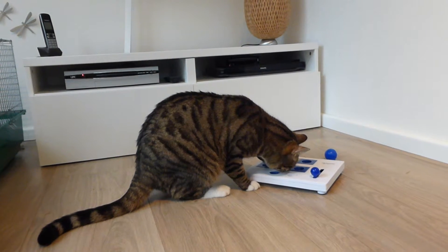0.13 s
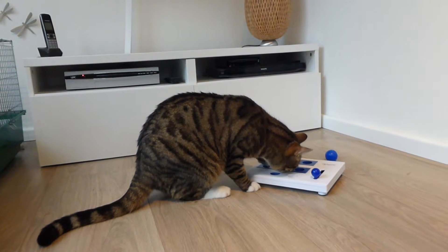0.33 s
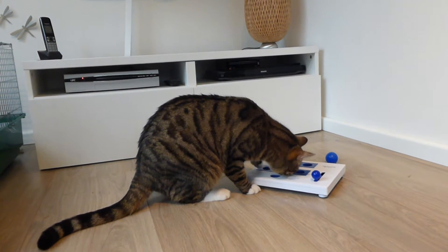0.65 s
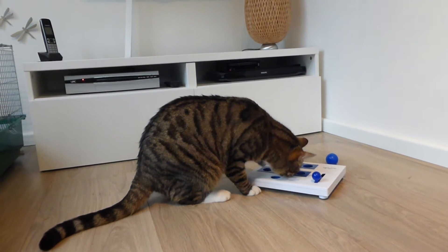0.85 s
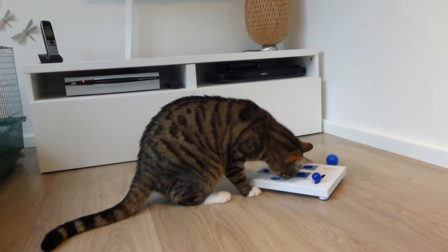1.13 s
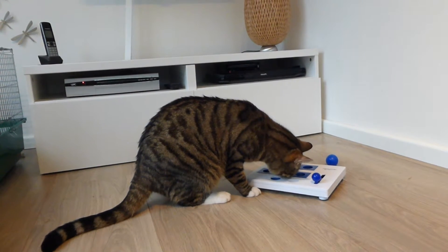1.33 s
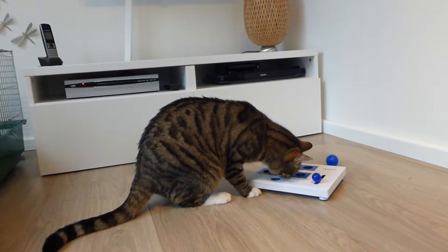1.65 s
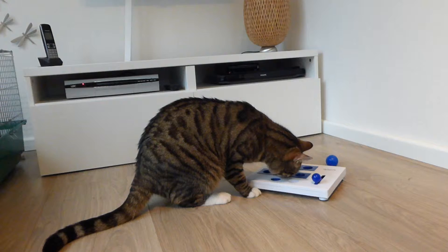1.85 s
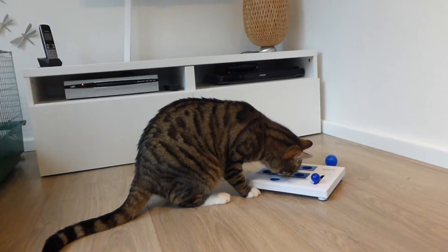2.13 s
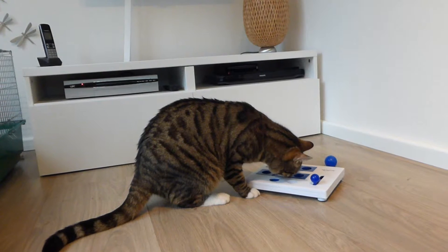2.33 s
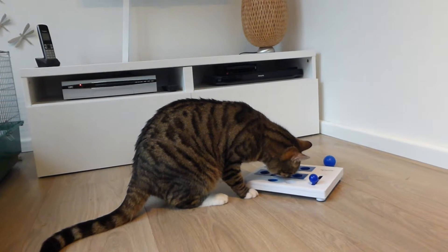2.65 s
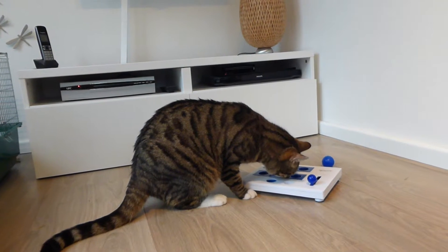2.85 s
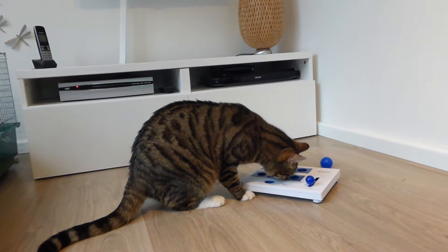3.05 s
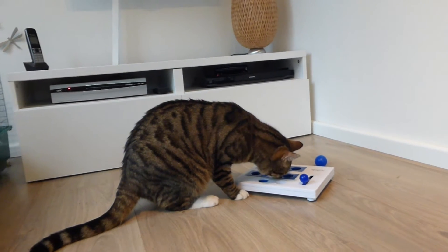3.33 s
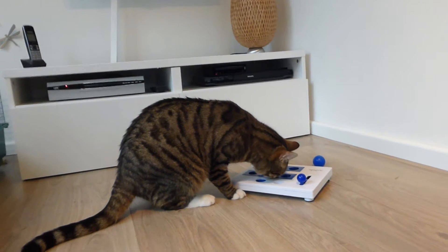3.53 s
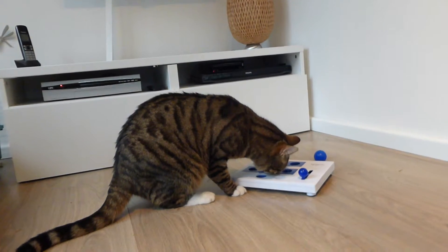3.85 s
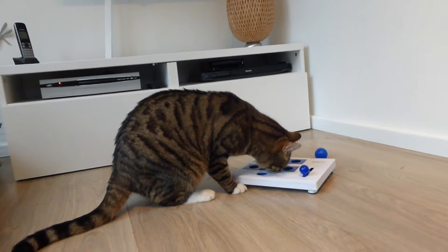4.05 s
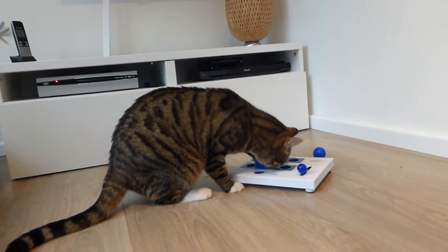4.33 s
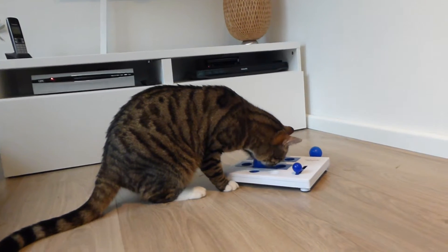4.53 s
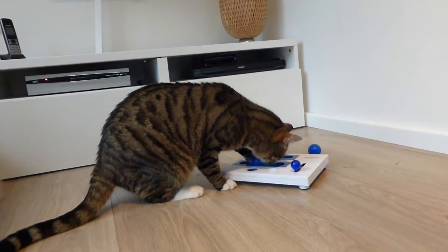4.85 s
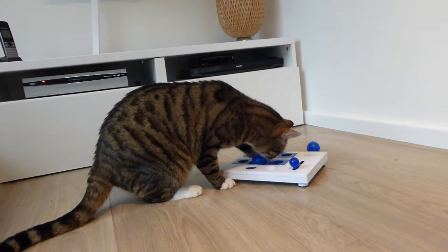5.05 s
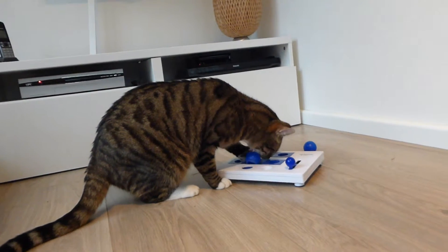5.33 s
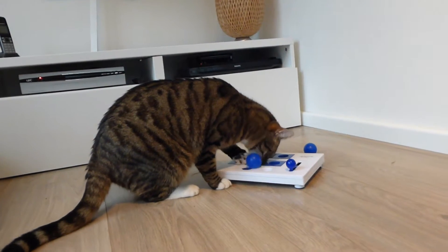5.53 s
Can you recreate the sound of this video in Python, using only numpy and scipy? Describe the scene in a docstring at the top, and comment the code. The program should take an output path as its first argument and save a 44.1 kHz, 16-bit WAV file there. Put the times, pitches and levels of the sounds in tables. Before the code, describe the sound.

A cat works a hollow plastic feeding puzzle on the floor of a bare room, with short, strong reverberation on every hit. Faint room hum and microphone hiss run throughout. A quick double knock and a small scrape come at about 0.3 seconds, followed by light taps and a brief rub around 1 second. From 1.5 seconds, plastic pegs and covers knock, click and slide busily, with gritty scrapes and a hollow ring from the tray. At 3.2 seconds a peg is hit squarely and rings briefly on one thin, high tone. Looser groups of knocks and scrapes follow at about 3.6, 4.2 and 4.7 seconds. The hardest knock lands at 5.1 seconds with a sharp scrape, and a last clattering jolt of the tray comes at 5.6 seconds.

```python
"""A cat noses and paws at a hollow plastic feeding puzzle on a laminate floor in a bare living room.
Room hum, microphone hiss and a thin whine sound from the start, with faint rubbing and a few knocks.
From 1.5 s pegs and covers knock and slide busily, driving the tray's resonances near 1 kHz, and the
room reverberates loudly. At 3.2 s a squarely hit peg rings on one tone. Looser groups of knocks and
scrapes follow, with the hardest blow at 5.1 s and a last jolt of the frame at 5.6 s."""
import sys
import numpy as np
from scipy import signal
from scipy.fft import rfft, irfft, next_fast_len
from scipy.io import wavfile
from scipy.ndimage import map_coordinates

SR = 44100
rng = np.random.default_rng(int(sys.argv[2]) if len(sys.argv) > 2 else 0)


def dump_mix(stems):
    """Bounce the given channels to the path in sys.argv[1] as a 16-bit WAV at rate SR."""
    frames = np.atleast_2d(stems).T  # one column per channel
    limited = np.clip(frames, -1, 1)  # hard clip at full scale
    pcm = np.round(limited * 32767).astype(np.int16)
    wavfile.write(sys.argv[1], SR, pcm)


N = 250929


def amp(db):
    """Amplitude ratio of a level in decibels."""
    return 10 ** (np.asarray(db) / 20)


def unit_rms(x):
    """Normalisation to unit mean power."""
    return x / np.sqrt(np.mean(x ** 2) + 1e-20)


def log_interp(points, hz):
    """Interpolation on a logarithmic frequency axis."""
    freqs, values = np.transpose(points)
    return np.interp(np.log(hz + 1), np.log(freqs + 1), values)


def filtered(x, response):
    """Linear filtering: the spectrum is multiplied by a frequency response."""
    size = next_fast_len(N + SR // 2)
    return irfft(rfft(x, size) * response(np.fft.rfftfreq(size, 1 / SR)), size)[..., :N]


def wobble(knots_per_s):
    """Slow random modulation: a spline through Gaussian values."""
    knots = rng.standard_normal(int(N * knots_per_s / SR) + 4)
    return map_coordinates(knots, [np.arange(N) * knots_per_s / SR])


# room hum and microphone hiss: (frequency [Hz], relative spectral density [dB])
HUM_SPECTRUM = [(15, -60), (25, -18), (64, -17.5), (82, -6.5), (149, -5), (344, -9), (373, -5.5), (439, -7),
                (840, -10.5), (988, -14.5), (2690, -20.5), (16000, -35.5)]


def background(hum_db=-52, whine_hz=15625, whine_db=-79):
    """Noise floor: broadband hum and hiss that waver a little, and a steady pure tone."""
    noise = unit_rms(filtered(rng.standard_normal(N), lambda hz: amp(log_interp(HUM_SPECTRUM, hz))))
    waver_db = 0.8 * wobble(3)
    whine = amp(whine_db) * np.sin(2 * np.pi * whine_hz * np.arange(N) / SR)
    return amp(hum_db + waver_db) * noise + whine


# the room's decay: (frequency [Hz], reverberation time T60 [s])
ROOM_T60 = [(200, 0.094), (530, 0.29), (1390, 0.44), (3680, 0.33), (9700, 0.25)]


def room(x, segments=24):
    """Reverberation: each frequency decays at its own rate; paths change as cat and puzzle shift."""
    out, step = np.zeros(N + 2 * SR), N // segments + 1
    for start in range(0, N, step):
        hz, t, spectra = signal.stft(rng.standard_normal(SR * 3 // 4), SR, nperseg=256)
        decay = amp(-60 * t / log_interp(ROOM_T60, hz)[:, None])
        tail = signal.istft(spectra * decay, SR, nperseg=256)[1]
        wet = signal.fftconvolve(x[start:start + step], tail / np.linalg.norm(tail))
        out[start + SR // 250:][:len(wet)] += wet  # the first reflection arrives after 4 ms
    return out[:N]


def resonate(force, modes, corner_hz=np.inf):
    """Modal superposition of damped resonators; finite contact time weakens the drive above a corner."""
    def response(f):
        modal_sum = sum((-1) ** k * amp(db) * 1j * f * width / (hz * hz - f * f + 1j * f * width)
                        for k, (hz, width, db) in enumerate(modes))
        return modal_sum / (1 + 1j * f / corner_hz) ** 2
    return filtered(force, response)


# a peg left free to ring: (frequency [Hz], bandwidth [Hz], gain [dB])
FREE_PEG_MODE = [(3680, 13, 14)]
# square hits on a peg: (time [s], force level [dB])
PEG_TAPS = [(2.426, -2), (3.227, 21.5)]


def peg_pings():
    """Impulse response: a clean tap leaves a lightly damped peg ringing on one thin tone."""
    taps = np.zeros(N)
    for start, db in PEG_TAPS:
        taps[round(start * SR)] = amp(db)
    return resonate(taps, FREE_PEG_MODE)


# pieces pushed along the tray:
# (time of full speed [s], rise [dB/s], hold [s], force level [dB], brightness [dB])
PUSHES = [(.16, 400, 0.055, -52, -30), (0.314, 453, 0.026, -19.5, -3), (1.09, 500, .02, -46, -24),
          (1.242, 413, 0.018, -17, -0.5), (1.54, 400, 0.15, -30, -7), (1.688, 600, 0.0082, -21, -8),
          (1.8, 400, 0.091, -33, -5), (2.119, 600, 0.14, -17, -16), (2.47, 500, 0.37, -24.5, -12.5),
          (2.859, 500, 0.069, -29, -24), (3.146, 600, 0.09, -17, -7), (3.646, 700, 0.018, -18, -4),
          (3.7, 500, 0.12, -28, -18), (4.07, 700, 0.033, -28, -12), (4.438, 202, 0.0067, -17, -10.5),
          (4.634, 598, 0.077, -13, -11), (4.919, 141, 0.038, -19.5, -11.5), (5.148, 898, 0.0067, -5.5, -7),
          (5.2, 516, 0.078, -30, -8), (5.463, 497, 0.035, -21, -19), (5.59, 400, .12, -22, -14)]


def slides(rubbing_db=-48, fall_db_per_s=400):
    """Stick-slip friction: gritty, lumpy forces on frame, tray, covers, pegs and edge."""
    t = np.arange(N) / SR
    envelopes = amp(rubbing_db + np.array([[-3.5], [0], [-8], [-15], [-16]])) * np.ones(N)
    for start, rise, hold, db, bright_db in PUSHES:
        speeding_up_db = rise * np.maximum(start - t, 0)
        stopping_db = fall_db_per_s * np.maximum(t - start - hold, 0)
        shares = amp([[-3.5], [0], [bright_db - 5], [bright_db - 12], [0.46 * bright_db - 15.5]])
        envelopes += amp(db - speeding_up_db - stopping_db) * shares
    noise = rng.standard_normal((5, N))
    grit_db = 6.34 * rng.standard_normal(N)
    lumps_db = 2.3 * wobble(55)
    return unit_rms(noise * amp(grit_db + lumps_db)) * envelopes


def contact(parts, landing_s=0.0012, fall_20db_s=0.0082):
    """Contact chatter: an exponentially decaying noise burst of unit energy for each part."""
    t = np.arange(SR // 8) / SR
    envelope = (1 - np.exp(-t / landing_s)) * amp(-20 * t / fall_20db_s)
    chatter = envelope * rng.standard_normal((parts, len(t)))
    return chatter / np.linalg.norm(chatter, axis=1, keepdims=True)


# knocks on the tray: (time [s], force level [dB], cover's share [dB], edge's share [dB])
TRAY_KNOCKS = [(0.215, -9.5, -27, -28), (0.318, 9, -3, -11), (0.334, 18.5, -5, -19), (0.942, 0, -3, -17),
               (0.951, -6.5, -3, -23), (1.072, -3.5, -19, -26), (1.452, 13.5, -12, -16),
               (1.566, -1, -29, -21), (1.653, 23.5, -10.5, -20), (1.665, 23.5, -9.5, -12.5),
               (1.834, -1, 1.5, -2), (1.953, 14, -6.5, -15), (2.088, 9.5, -13, -25),
               (2.111, 17, -6.5, -17.5), (2.17, 12.5, 0.5, -25), (2.194, 15.5, 4.5, -6.5),
               (2.212, 21, -8.5, -11.5), (2.227, 11.5, 4.5, -28), (2.252, 19.5, -11, -12.5),
               (2.428, 17.5, -5.5, -18), (2.444, 6.5, -4, -19), (2.499, 11.5, -7.5, -15),
               (2.643, 19, -7, -18), (2.649, 20.5, -6, -17), (2.742, -6, 6, -3), (2.809, 9, -19.5, -10),
               (2.83, 17.5, -7.5, -26), (3.107, 8, -8, -17), (3.126, 17.5, -5, -17), (3.155, 20, -6, -17),
               (3.225, 16.5, -0.5, -6.5), (3.291, 9, -29, -15), (3.62, 13.5, -6.5, -17.5),
               (3.753, 7.5, -21, -15.5), (4.042, -7.5, -7, 8.5), (4.056, 4.5, -16, -4),
               (4.111, 12, -18, -21), (4.237, 17.5, -10.5, -19), (4.595, 7.5, -25, -36),
               (4.622, 13, -8, -21), (4.684, 19.5, -12.5, -12.5), (4.707, 18.5, -21, -23),
               (5.074, 20, -7.5, -18.5), (5.137, 25, -10, -14), (5.54, 18, -14.5, -14),
               (5.592, 21, -11.5, -16.5)]
# the frame jolts on its feet: (time [s], force level [dB])
FRAME_JOLTS = [(0.335, 12), (2.168, 12), (2.252, 12), (4.706, 8), (5.138, 1), (5.592, 14)]


def knocks(frame_share_db=-9.5, peg_share_db=-18):
    """Impact: an impulse, then brief chatter, as forces on frame, tray, covers, pegs and edge."""
    forces = np.zeros((5, N + SR))
    for start, db, cover_db, edge_db in TRAY_KNOCKS:
        blow = contact(parts=5)
        blow[:, 0] += [0.77, 1.0, 0.83, 0.51, 0.031]  # the impulse weighs most in the low-pitched parts
        shares = amp([[frame_share_db], [0], [cover_db], [peg_share_db], [edge_db]])
        forces[:, round(start * SR):][:, :SR // 8] += amp(db) * shares * blow
    for start, db in FRAME_JOLTS:
        forces[0, round(start * SR):][:SR // 8] += amp(db) * contact(parts=1)[0]
    return forces[:, :N]


# resonances of the plastic parts: (frequency [Hz], bandwidth [Hz], gain [dB])
FRAME_MODES = [(337, 61, -8), (420, 77, 5), (496, 160, 0), (633, 160, -11.5)]
TRAY_MODES = [(564, 266, -9.5), (816, 390, -9), (908, 48.4, 6), (956, 337, 1.5), (1266, 31, -7),
              (1271, 52, -2.5), (1508, 200, 1.5), (1605, 200, 0)]
HOLLOW_MODES = [(900, 12, 12), (962, 16, 11), (1023, 12, 12)]  # the tray's long ring: three close tones that beat
COVER_MODES = [(1985, 430, 1.5), (2100, 159, 7), (2331, 180, 3), (2480, 140, 7), (2670, 244, 2),
               (2990, 300, -1.5)]
PEG_MODES = [(3450, 160, 0), (3680, 40, 5), (3950, 300, -2)]
# drive of the long ring, low while a paw rests on the tray: (time [s], gain [dB])
HOLLOW_DRIVE = [(0, -32), (1.4, -14.5), (1.9, -4), (2.3, -9), (2.7, -2), (3.2, -2), (3.7, -1.5), (4.2, -14),
                (4.7, -6.5), (5.2, -1), (5.69, -7)]
# crack of the hard edge: (frequency [Hz], gain [dB])
CRACK_SPECTRUM = [(200, -28), (1500, 0.5), (4000, -8.5), (6000, -14.5), (10000, -22.5), (14000, -29.5),
                  (16000, -36)]


def puzzle():
    """Forced vibration: impact and friction excite each part's modes; the edge gives a broadband crack."""
    on_frame, on_tray, on_covers, on_pegs, on_edge = knocks() + slides()
    freedom = amp(np.interp(np.arange(N) / SR, *np.transpose(HOLLOW_DRIVE)))
    frame = resonate(on_frame, FRAME_MODES, corner_hz=1200)
    tray = resonate(on_tray, TRAY_MODES, corner_hz=2200)
    hollow = resonate(freedom * on_tray, HOLLOW_MODES, corner_hz=2200)
    covers = resonate(on_covers, COVER_MODES, corner_hz=3500)
    pegs = resonate(on_pegs, PEG_MODES, corner_hz=4500) + amp(-10) * peg_pings()
    crack = filtered(on_edge, lambda hz: amp(log_interp(CRACK_SPECTRUM, hz)))
    return frame + tray + hollow + covers + pegs + crack


def scene():
    """Superposition of direct sound, reverberant field and noise floor in one channel."""
    direct = puzzle()
    return (direct + amp(-1) * room(direct) + background())[None]


def record(dry):
    """Band limiting: an ideal low-pass filter removes the highest treble."""
    return filtered(dry, lambda hz: hz < 15950)


dry = scene()
out = record(dry)
dump_mix(out)
```